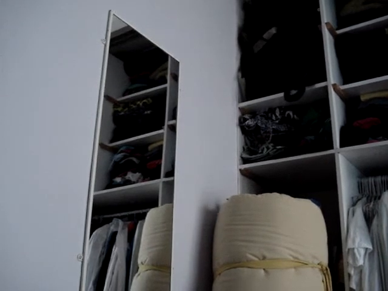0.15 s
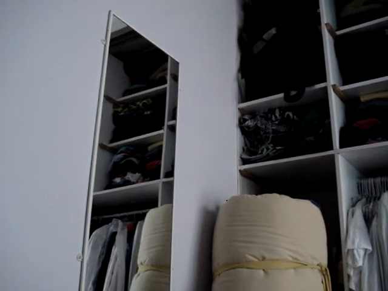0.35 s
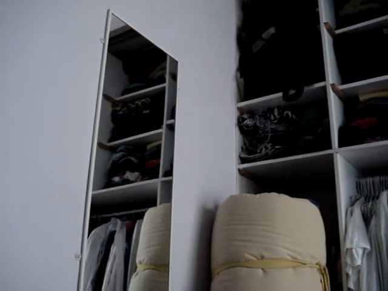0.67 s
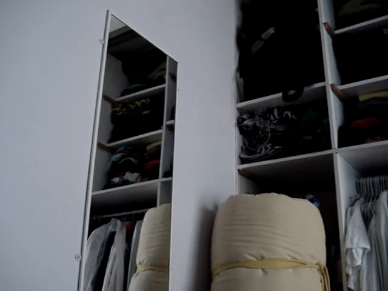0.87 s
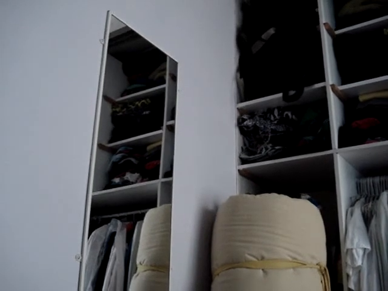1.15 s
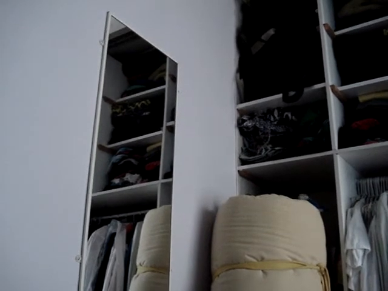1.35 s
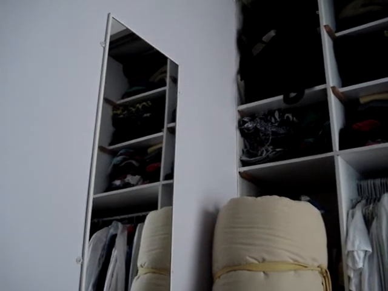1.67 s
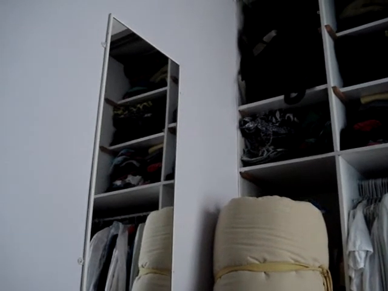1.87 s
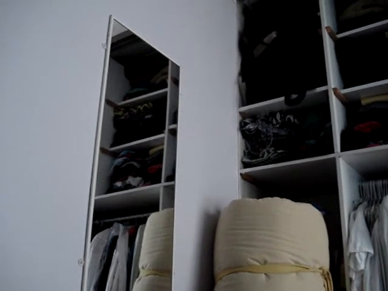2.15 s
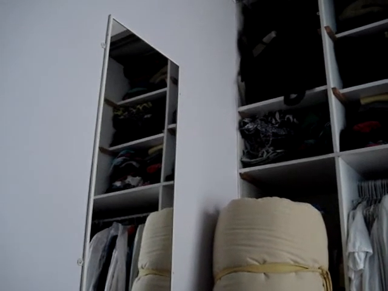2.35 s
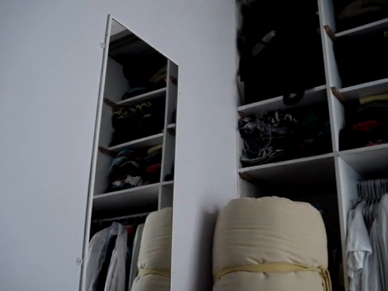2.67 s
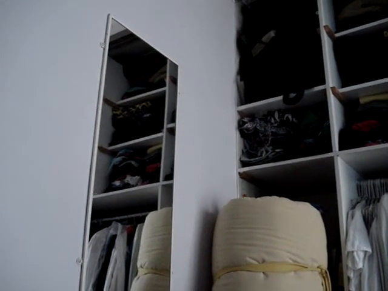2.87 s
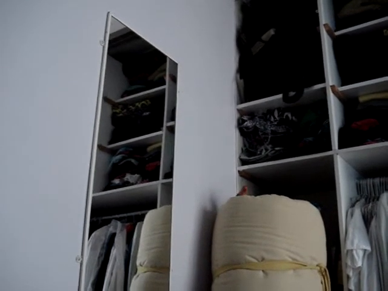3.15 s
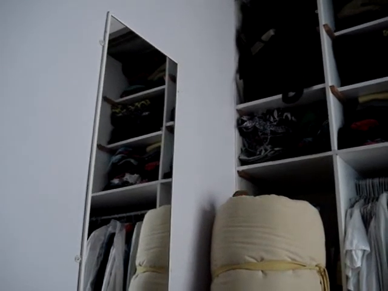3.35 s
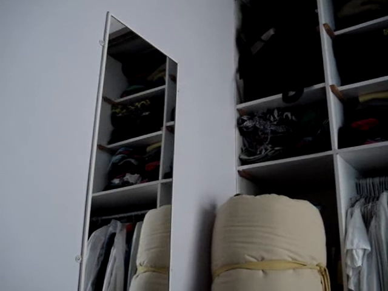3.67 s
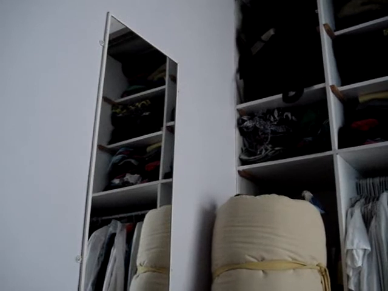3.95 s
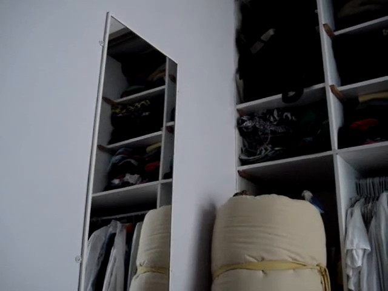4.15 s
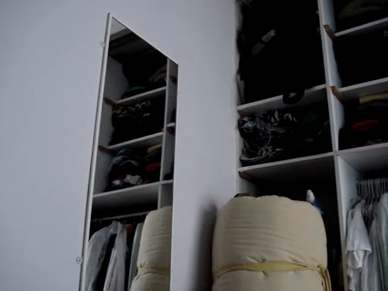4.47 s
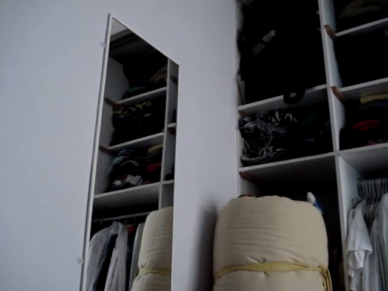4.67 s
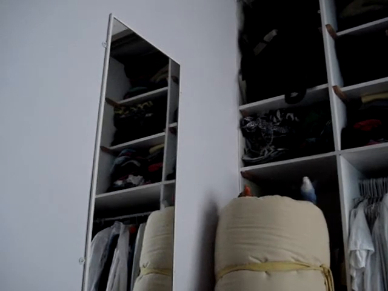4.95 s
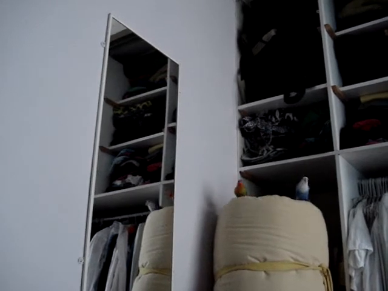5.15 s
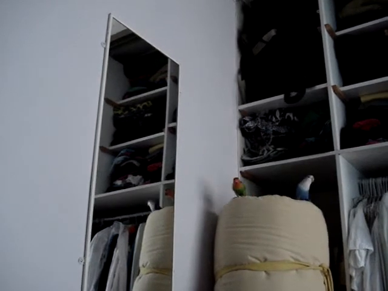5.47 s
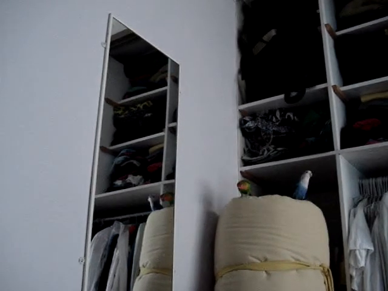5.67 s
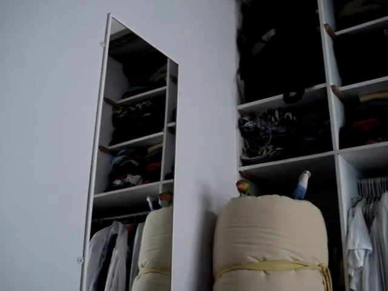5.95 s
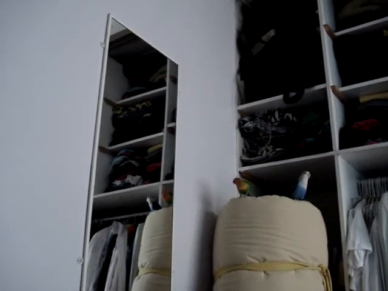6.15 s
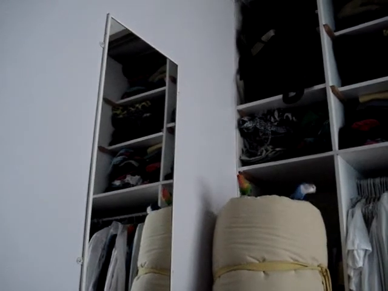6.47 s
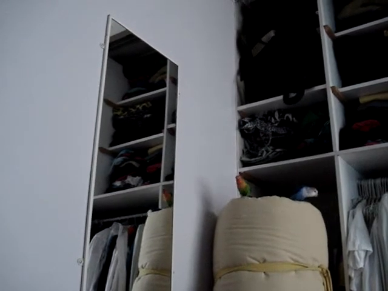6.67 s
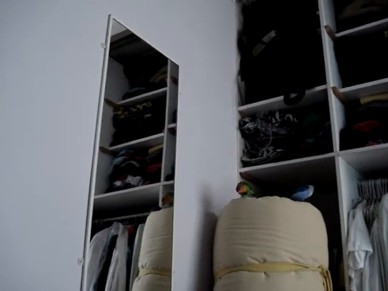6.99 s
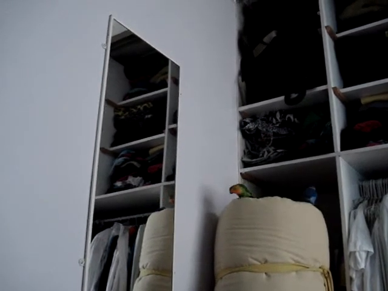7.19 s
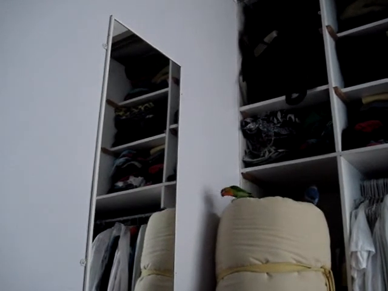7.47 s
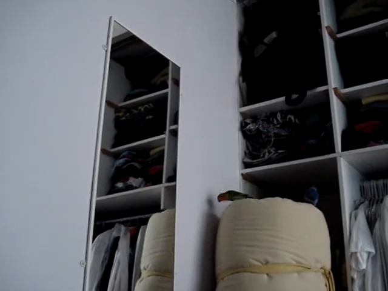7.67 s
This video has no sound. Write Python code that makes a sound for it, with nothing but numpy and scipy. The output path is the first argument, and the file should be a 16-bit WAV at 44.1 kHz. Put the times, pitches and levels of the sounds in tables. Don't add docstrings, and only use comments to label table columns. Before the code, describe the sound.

In a quiet bedroom with low hiss, small parrots give two isolated piercing peeps, then four rapid raspy chirps that make the microphone thump.

```python
import sys
import numpy as np
from scipy import signal
from scipy.fft import rfft, irfft
from scipy.io import wavfile
from scipy.ndimage import uniform_filter1d

SR = 44100
rng = np.random.default_rng(int(sys.argv[2]) if len(sys.argv) > 2 else 0)


def undo_db(level):
    steps = np.asarray(level, float) / 20
    return 10 ** steps


def generate_wav(sig):
    pcm = np.round(np.clip(np.atleast_2d(sig).T, -1, 1) * 32767).astype(np.int16)
    wavfile.write(sys.argv[1], SR, pcm)


N = 344752

# start_s, first_note_s, whole_call_s, level_db, pitch_hz
WHISTLE_CALLS = [
    (.954, 0.0066, 0.078, -16.5, 6016),
    (3.9153, .010, 0.078, -13.5, 6574),
]
# waver (0-1), breath_db
WHISTLE_ROUGHNESS = [(0.024, -27.5), (0.024, -39.5)]
WHISTLE_BEATS = (328.4, 431)
WHISTLE_JOINS = (-1.5, -2)
WHISTLE_ATTACKS = (0.0095, 0.0027)
WHISTLE_GESTURE = dict(drop_in=1.0, leap=1.045, break_db=-1.5, settle_s=.006, settled=1.02, resume_db=-4.5, fade_db=-9.5, early_db=-11)

# start_s, first_note_s, whole_call_s, level_db, pitch_hz
CHIRP_CALLS = [
    (5.0411, .011, 0.041, -26, 3974),
    (5.1474, .009, 0.074, -17.5, 2800),
    (5.227, 0.013, 0.075, -13.5, 2452),
    (5.3215, 0.002, 0.075, -11.5, 2450),
]
# first_db, second_db, third_db, fourth_db
CHIRP_OVERTONES = [(0.5, -7.5, -40.5, -46), (-7.5, 3, -12.5, -33), (-7.5, 1.5, -3.5, -26.5),
                   (-4, 6, -0.5, -23)]
# waver (0-1), breath_db
CHIRP_ROUGHNESS = [(0.05, -16.5), (0.03, -23), (0.035, -25), (0.08, -15)]
# fall_db per overtone, sum_tones_db
CHIRP_SECOND_VOICE = [(-15, -14), (-12.5, -24), (-7, -5.5), (-6, -14)]
CHIRP_BEATS = (650, 489.5, 660, 698)
CHIRP_JOINS = (-8, 6.5, 1.5, -4.5)
CHIRP_GESTURE = dict(drop_in=1.07, leap=1.12, break_db=-12.5, settle_s=0.00492, settled=1.02, resume_db=-2, fade_db=-16.5, early_db=-6.5)

# start_s, bias_jump_db, slide_back_s, spike_db
OVERLOAD_HITS = [(0.9753, -28.5, 0.014, -22.5), (0.9912, -31, 0.011, -25), (3.919, -30, 0.042, -24.5),
                 (3.936, -51, 0.026, -40), (5.1503, -27.5, 3.1, -15.5), (5.1606, -75, .01, -33),
                 (5.167, -65, .01, -32.5), (5.1702, -61, .01, -36), (5.1853, -61, .01, -42),
                 (5.23, -43, .006, -29), (5.238, -52, .01, -29), (5.242, -52, 0.022, -41),
                 (5.2556, -45, 0.026, -25), (5.3294, -63, 0.014, -25.5)]
# frequency_hz, density_db (per Hz)
HISS_SPECTRUM = [(15, -32), (25, -10.5), (150, -6), (330, -1.5), (1390, -8), (2890, -12), (6790, -20),
                 (9800, -33)]
# frequency_hz, density_db (per Hz)
CONVERTER_SPECTRUM = [(200, -19), (700, 1.5), (1400, -2.5), (2800, -3), (5600, -9), (9000, -11.5),
                      (22000, -38)]

CHIRP_ATTACK_S = 0.003
SILENT_DB = -32.5
STEADY_S = 0.0097
ROOM_T60_S, ROOM_BUILD_S, FIRST_ECHO_S = 0.31, 0.004, 0.0015
WHISTLE_ROOM_DB, CHIRP_ROOM_DB = -7.5, -3
COUPLING_HZ = 5.6
HISS_DB, CONVERTER_DB = -52.5, -59
DUCK_FROM_S, DUCK_UNTIL_S, DUCK_DB, RECOVER_S = 5.137, 5.432, -16.5, 0.66
CEILING = 0.33
TOP_HZ = 10030


def whistles():
    out = np.zeros(N)
    settings = zip(WHISTLE_CALLS, WHISTLE_ATTACKS, WHISTLE_JOINS, WHISTLE_BEATS, WHISTLE_ROUGHNESS)
    for row, attack_s, join_db, beat_hz, (waver, breath_db) in settings:
        corners = contour(*row, attack_s, join_db, **WHISTLE_GESTURE)
        out += call(corners, (0,), beat_hz, waver, (0, 0),
                    flutter_db=4.0, lower_db=-9, breath_db=breath_db)
    return out


def chirps():
    out = np.zeros(N)
    settings = zip(CHIRP_CALLS, CHIRP_JOINS, CHIRP_OVERTONES, CHIRP_BEATS,
                   CHIRP_ROUGHNESS, CHIRP_SECOND_VOICE)
    for row, join_db, overtones_db, beat_hz, (waver, breath_db), second_voice in settings:
        corners = contour(*row, CHIRP_ATTACK_S, join_db, **CHIRP_GESTURE)
        out += call(corners, overtones_db, beat_hz, waver, second_voice,
                    flutter_db=3.5, lower_db=-22, breath_db=breath_db)
    return out


def contour(start, first, whole, db, hz, attack_s, late_db,
            drop_in, leap, break_db, settle_s, settled, resume_db, fade_db, early_db):
    full = start + attack_s
    broken = full + first
    early_db = late_db + early_db
    resumed_db = db + resume_db
    return [(start, hz * drop_in, db + SILENT_DB, early_db),
            (full, hz * (1 + drop_in) / 2, db, early_db),
            (full + first * 0.718, hz, db, early_db),
            (broken, hz * leap, db + break_db, late_db),
            (broken + settle_s, hz * settled, resumed_db, late_db),
            (start + whole, hz * settled, resumed_db + fade_db, late_db)]


def call(corners, overtones_db, beat_hz, waver, second_voice, flutter_db, lower_db, breath_db):
    s, hz, db, second_db = np.transpose(corners)
    i = np.arange(int(s[0] * SR), int(s[-1] * SR))
    t = i / SR
    pitch_waver = wobble(5000, 319)[:len(i)]
    flutter = wobble(5000, 250)[:len(i)]
    beat_drift = wobble(5000, 140)[:len(i)]
    air = rng.standard_normal(5000)[:len(i)]

    unsteady = np.minimum((i - i[0]) / (STEADY_S * SR), 1)
    pitch_hz = np.interp(t, s, hz) * (1 + waver * pitch_waver * unsteady)
    phase = 2 * np.pi * np.cumsum(pitch_hz) / SR
    beat = np.exp(2j * np.pi * np.cumsum(beat_hz * (1 + 0.17 * beat_drift)) / SR)
    second = undo_db(np.interp(t, s, second_db))

    fall_db, sum_db = second_voice
    tone = np.zeros(len(i), complex)
    for k, overtone_db in enumerate(overtones_db):
        company = undo_db(k * fall_db) * beat ** (k + 1) + undo_db(lower_db) / beat
        if k > 0:
            company = company + undo_db(sum_db) * beat
        tone += undo_db(overtone_db) * np.exp(1j * (k + 1) * phase) * (1 + second * company)

    rasp = undo_db(breath_db) * np.gradient(np.gradient(air))
    edge_fade = np.minimum(np.minimum(i[-1] - i, i - i[0]) / (0.0034 * SR), 1)
    level = undo_db(np.interp(t, s, db) + flutter_db * flutter)
    out = np.zeros(N)
    out[i] = (tone.imag + rasp) * edge_fade * level
    return out


def wobble(n, rate_hz):
    k = int(SR / rate_hz)
    noise = rng.standard_normal(n + 4 * k)
    smooth = uniform_filter1d(uniform_filter1d(noise, k), k)[2 * k:2 * k + n]
    return smooth / smooth.std()


def room(x, wet_db):
    t = np.arange(SR // 2) / SR
    late = np.maximum(t - FIRST_ECHO_S, 0)
    clumps_db = 2.5 * wobble(len(t), 120)
    build = 1 - np.exp(-late / ROOM_BUILD_S)
    echoes = rng.standard_normal(len(t)) * build * undo_db(-60 * t / ROOM_T60_S + clumps_db)
    echoes = echoes / np.linalg.norm(echoes)
    return x + undo_db(wet_db) * signal.fftconvolve(x, echoes)[:N]


def overloads():
    t = np.arange(N) / SR
    bias, spikes = np.zeros(N), np.zeros(N)
    for s, jump_db, back_s, spike_db in OVERLOAD_HITS:
        bias += undo_db(jump_db) * (t >= s) * np.clip(1 - (t - s) / back_s, 0, 1)
        spikes -= undo_db(spike_db) * np.exp(-((t - s) / 0.00006) ** 2)
    b, a = signal.butter(1, COUPLING_HZ, "high", fs=SR)
    return signal.lfilter(b, a, bias) + spikes


def duck():
    t = np.arange(N) / SR
    down = np.clip((t - DUCK_FROM_S) / (DUCK_UNTIL_S - DUCK_FROM_S), 0, 1)
    recovery = np.exp(-np.maximum(t - DUCK_UNTIL_S, 0) / RECOVER_S)
    return undo_db(DUCK_DB * down * recovery)


def coloured(spectrum, db):
    hz, shape_db = np.transpose(spectrum)
    log_hz = np.log(np.maximum(np.arange(N // 2 + 1) * SR / N, 1))
    shape = undo_db(np.interp(log_hz, np.log(hz), shape_db))
    x = irfft(rfft(rng.standard_normal(N)) * shape, N)
    return x * undo_db(db) / x.std()


def scene():
    birds = room(whistles(), WHISTLE_ROOM_DB) + room(chirps(), CHIRP_ROOM_DB)
    return (birds + coloured(HISS_SPECTRUM, HISS_DB))[None]


def top_cut(x):
    return signal.sosfilt(signal.butter(12, 10300, fs=SR, output="sos"), x)


def record(dry):
    x = dry * duck()
    x = x / (1 + (x / CEILING) ** 4) ** (1 / 4)
    x = x + overloads() + coloured(CONVERTER_SPECTRUM, CONVERTER_DB)
    band_limit = signal.ellip(12, 0.3, 80, TOP_HZ, fs=SR, output="sos")
    mix = signal.sosfilt(band_limit, x)
    return top_cut(mix)


dry = scene()
out = record(dry)
generate_wav(out)
```